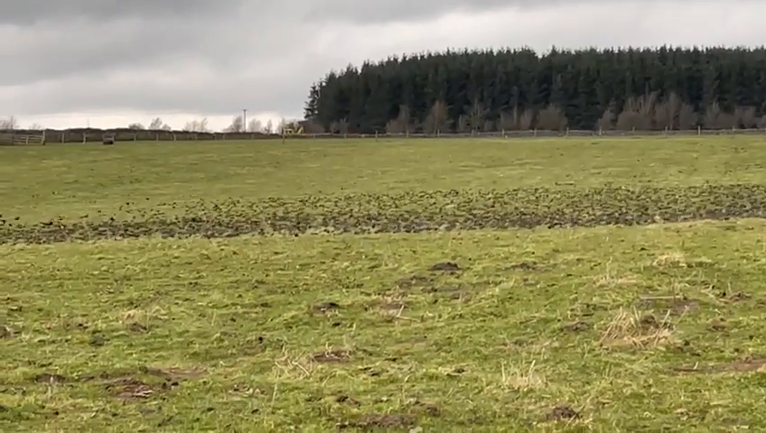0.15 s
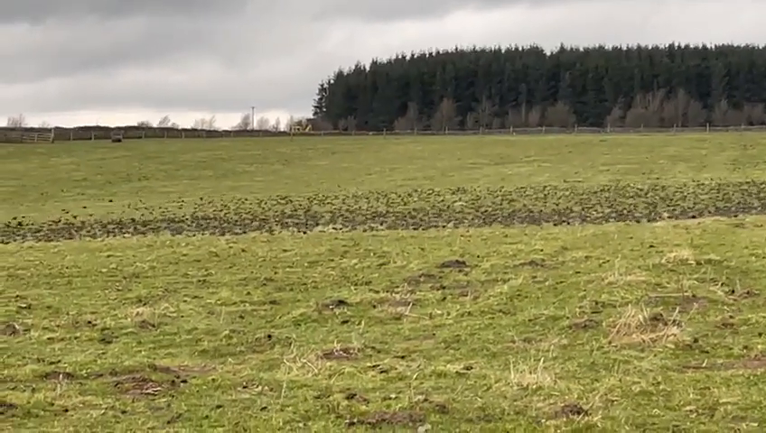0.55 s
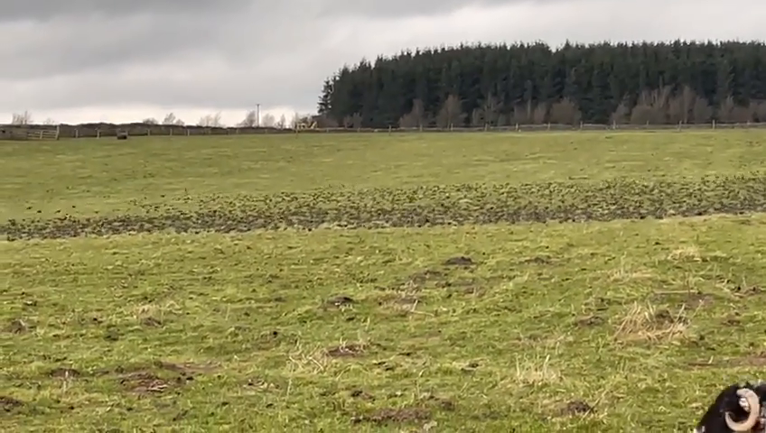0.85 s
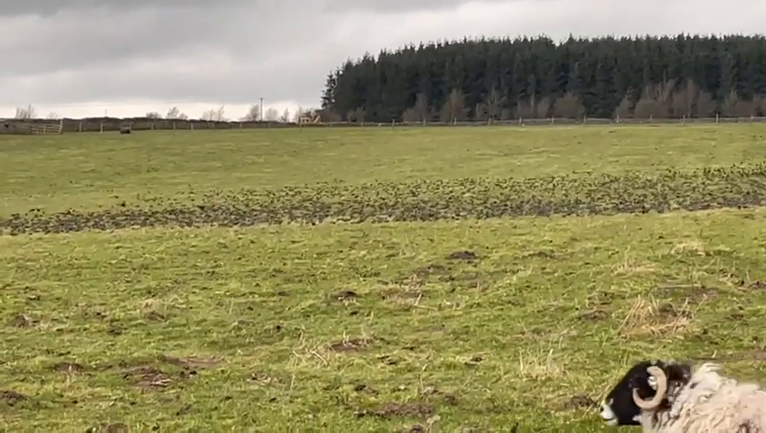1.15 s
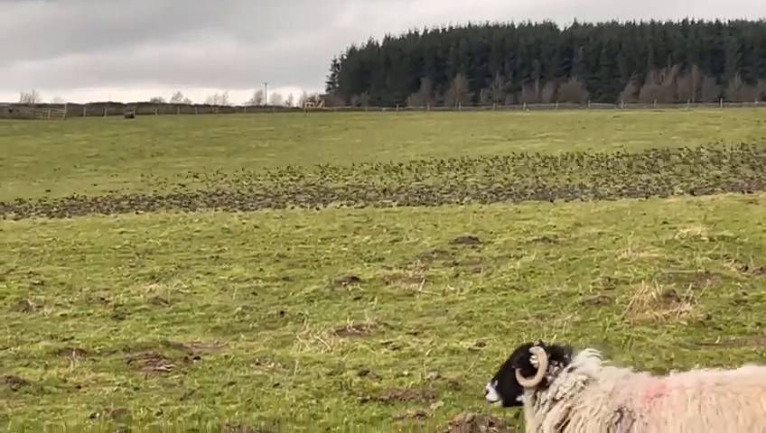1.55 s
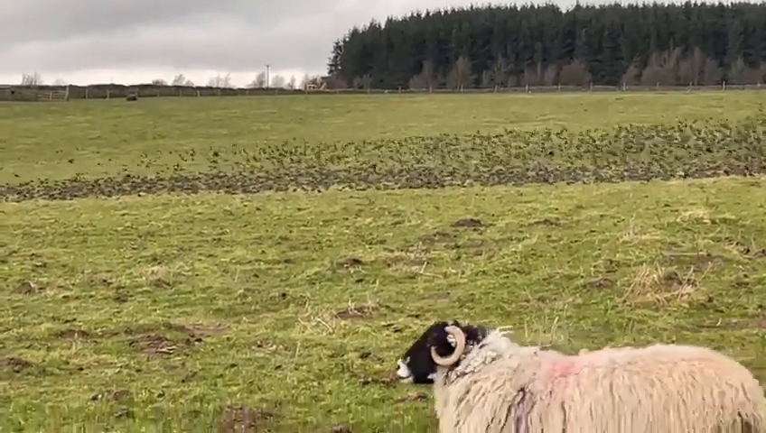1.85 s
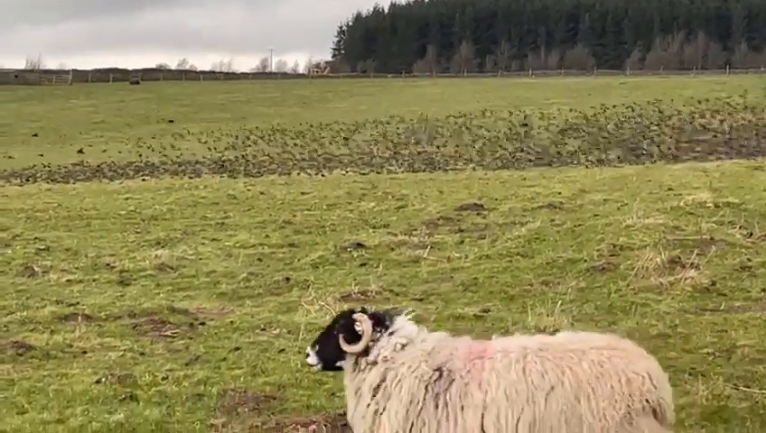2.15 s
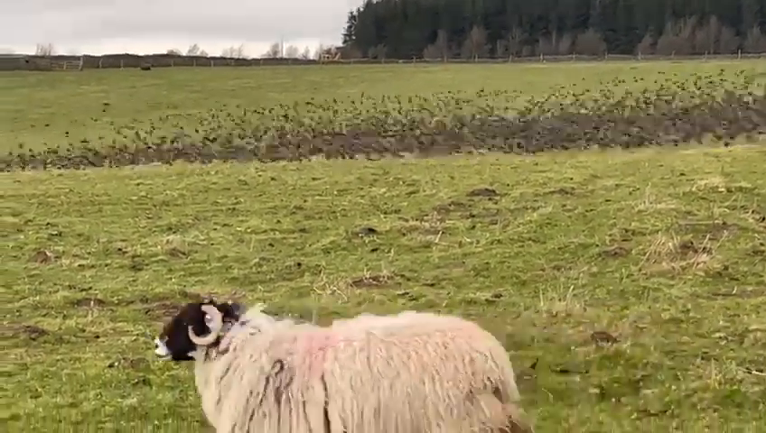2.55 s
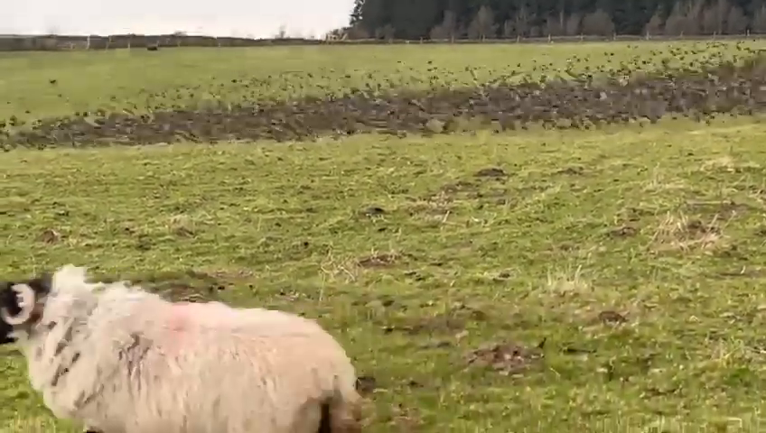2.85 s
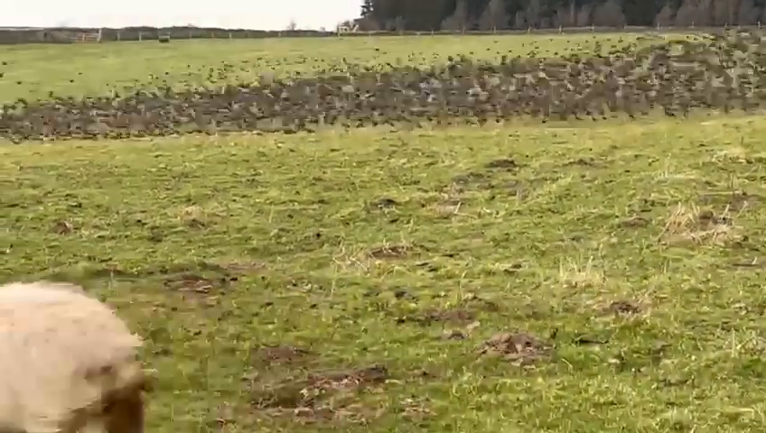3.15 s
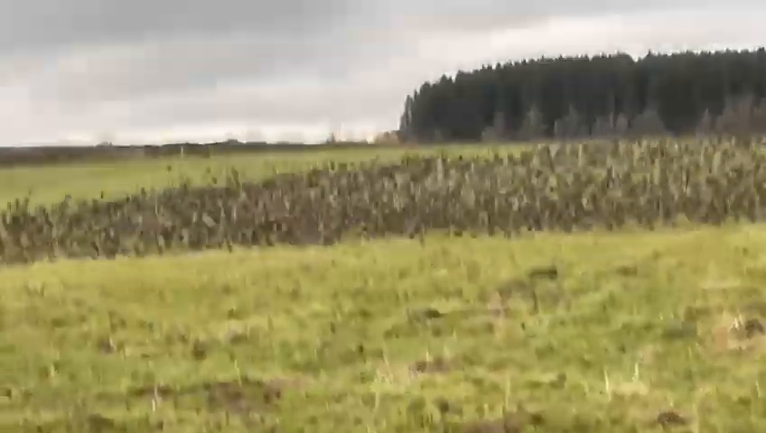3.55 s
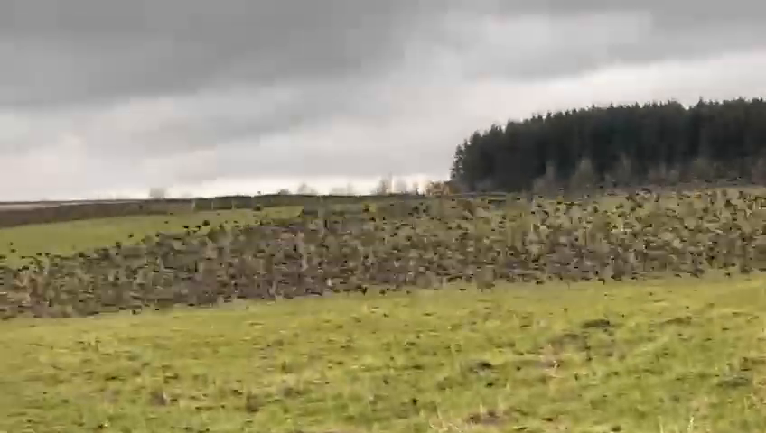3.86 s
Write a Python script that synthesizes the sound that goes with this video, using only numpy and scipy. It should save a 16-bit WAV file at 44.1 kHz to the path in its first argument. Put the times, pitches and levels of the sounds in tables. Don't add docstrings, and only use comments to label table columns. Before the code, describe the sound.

A large starling flock on an open field twitters in a thin, flickering hiss, then takes off with a deep, soft wing roar from about 1.7 seconds. Small handling ticks sit close to the stereo microphone.

```python
import sys
import numpy as np
from scipy import signal
from scipy.fft import rfft, irfft
from scipy.io import wavfile
from scipy.ndimage import uniform_filter1d

SR = 44100
rng = np.random.default_rng(int(sys.argv[2]) if len(sys.argv) > 2 else 0)


def wav_out(sig):
    wavfile.write(sys.argv[1], SR, np.round(np.clip(np.atleast_2d(sig).T, -1, 1) * 32767).astype(np.int16))


def voltage_ratio(decibels):
    exponent = np.asarray(decibels, float) / 20
    return 10 ** exponent


N = 176400
T = np.arange(N) / SR
HZ = np.fft.rfftfreq(N, 1 / SR)


def on_hz(table):
    f, v = np.array(table, float).T
    return np.interp(np.log(HZ + 1), np.log(f), v)


def curve(table, column):
    a = np.array(table, float)
    return np.interp(T, a[:, 0], a[:, column])


def colour(x, table):
    lo, hi = table[0][0], table[-1][0]
    ends = np.sqrt(1 + (lo / (HZ + 1)) ** 8 + (HZ / hi) ** 8)
    y = irfft(rfft(x) * voltage_ratio(on_hz(table)) / ends, N)
    return y / np.std(y)


def walk(rate_hz):
    k = int(SR / rate_hz)
    steps = np.repeat(rng.standard_normal(N // k + 3), k)
    return 1.529 * uniform_filter1d(uniform_filter1d(steps, k), k)[k:k + N]


def patchy(table, flicker_db, rate_hz):
    spectrum = rfft(colour(rng.standard_normal(N), table))
    half_octave = 2 * np.log2(HZ + 1)
    out = np.zeros(N)
    for k in range(15, 29):
        is_top = k > 25
        depth_db = flicker_db - 0.2 * is_top
        band = irfft(spectrum * np.clip(1 - abs(half_octave - k), 0, 1), N)
        out += band * voltage_ratio(depth_db * walk(rate_hz * (1 + is_top)))
    return out / np.std(out)


def add(out, start_s, x):
    i = int(max(start_s, 0) * SR)
    out[i:i + len(x)] += x[:N - i]


def note(length_s, hz0, hz1, rough, blur_hz):
    n = int(length_s * SR)
    wobble = uniform_filter1d(rng.standard_normal((2, 8192)), max(int(SR / blur_hz), 1))[:, :n]
    wobble = wobble / np.std(wobble)
    tone = np.exp(2j * np.pi * np.cumsum(np.linspace(hz0, hz1, n)) / SR)
    voice = np.real(tone * (1 - rough + rough * (wobble[0] + 1j * wobble[1])))
    return voice * np.sin(np.pi * np.arange(n) / n) ** .5


def crowd(count, centre_hz, octaves, longest_s, rough, blur_hz):
    out = np.zeros(N)
    for when, pitch, glide, length, loud in rng.random((count, 5)):
        hz = centre_hz * 2 ** (octaves * (pitch - .55))
        end_hz = hz * (1 + octaves * 0.316 * (glide - .55))
        add(out, 4 * when, note(.008 + longest_s * length, hz, end_hz, rough, blur_hz) * voltage_ratio(3.3 * loud))
    return out / np.std(out)


def tick(hz, cycles):
    t = np.arange(400) / SR
    grit = uniform_filter1d(rng.standard_normal((2, 400)), max(int(SR / hz), 1)) * np.sqrt(SR / hz)
    ring = np.imag(np.exp(2j * np.pi * hz * t) * (1 + 0.4 * (grit[0] + 1j * grit[1])))
    rise = np.minimum(t * hz / 1.8, 1) ** 2
    return np.exp(-t * hz / cycles) * rise * ring * 1.74


# t/s, wing stroke level/dB, feather rush level/dB, chatter level/dB
FLOCK_LEVELS = [(0, -69, -77.5, -65.5), (.14, -65, -78.5, -64), (.2, -64.5, -76.5, -71),
                (.5, -63, -75.5, -68.5), (.62, -62.5, -75, -66), (.8, -57.5, -75, -68),
                (1.35, -56, -77, -68), (1.5, -54, -76, -67), (1.7, -46.5, -77.5, -66.5),
                (1.9, -44, -74, -69.5), (2.1, -44, -71, -69.5), (2.45, -44, -66.5, -64.5),
                (2.8, -46, -68.5, -66), (3.1, -46, -69, -64.5), (3.3, -43, -68.5, -64),
                (3.55, -46.5, -67.5, -64), (3.7, -44.5, -66, -62.5), (4, -44, -65.5, -62)]
# f/Hz, level/dB (per Hz)
STROKE_SPECTRUM = [(32, -13), (48, -2), (80, 2.5), (130, -4), (250, -12.5), (400, -20.5), (560, -30),
                   (900, -74.5)]
# f/Hz, level/dB (per Hz)
RUSH_SPECTRUM = [(400, 10), (800, 1), (1300, -1), (1650, 1.5), (1900, -1), (2250, 2), (3000, 0),
                 (12500, -19)]


def wings():
    beats_per_s, groups, stroke_s = 14, 60, 0.011
    beat = np.zeros(N)
    for rate, phase, size in rng.random((groups, 3)):
        at_s = (np.arange(100) + phase) / (beats_per_s * (0.95 + .5 * rate))
        at = (at_s * SR).astype(int)
        beat[at[at < N]] += voltage_ratio(5.5 * size) ** 2
    k = int(stroke_s * SR)
    puffs = np.sqrt(uniform_filter1d(uniform_filter1d(beat, k), k) / np.mean(beat))
    gusts = voltage_ratio(0.6 * walk(7.06))
    roar = colour(puffs * rng.standard_normal(N), STROKE_SPECTRUM) * gusts
    rush = patchy(RUSH_SPECTRUM, 1.0, 9) * puffs ** 0.29
    return roar * voltage_ratio(curve(FLOCK_LEVELS, 1) - 1.5) + rush * voltage_ratio(curve(FLOCK_LEVELS, 2) + 6.5)


def chatter():
    thinning = voltage_ratio(-4 - 5.7 * np.clip(T - 2.1, 0, 1))
    high = thinning * crowd(360, 5000, .9, 0.027, 0.6, 700)
    alarm = 0.25 + 2 * np.exp(-((T - 2.42) / .33) ** 2)
    calm_whistles = crowd(180, 1730, 0.209, 0.031, 0.19, 110)
    alarm_whistles = alarm * crowd(360, 2270, 0.197, 0.04, 0.44, 150)
    low = voltage_ratio(-12.5) * (calm_whistles + alarm_whistles)
    return (high + low) * voltage_ratio(curve(FLOCK_LEVELS, 3))


# f/Hz, level/dB (per Hz)
FAR_VOICE_SPECTRUM = [(1200, -26.5), (1700, -7.5), (2000, -9.5), (3200, -5.5), (5000, -0.5), (6500, -4),
                      (9000, -6), (12500, -15)]


def far_voices():
    flicker = voltage_ratio(1.1 * walk(11))
    return patchy(FAR_VOICE_SPECTRUM, 3.17, 10) * flicker * voltage_ratio(curve(FLOCK_LEVELS, 3) + 0.1)


# start t/s, length t/s, start f/Hz, end f/Hz, level/dB
NEAR_CALLS = [(0.063, 0.11, 4900, 4470, -64), (0.088, 0.075, 6000, 6280, -64),
              (0.28, 0.062, 4220, 4690, -63.5), (0.317, 0.066, 7000, 6460, -67),
              (0.54, 0.041, 4200, 4050, -64), (0.576, 0.14, 5500, 4740, -60),
              (0.753, .08, 5000, 5060, -65.5), (0.895, 0.0058, 7000, 5740, -61),
              (0.9, 0.036, 6800, 6860, -62.5), (0.944, 0.066, 5800, 5600, -63),
              (1.017, 0.048, 5100, 4680, -58), (1.075, 0.049, 5300, 5270, -62),
              (1.306, 0.082, 5100, 4840, -61), (1.447, 0.04, 5000, 4550, -64),
              (1.47, 0.04, 4400, 4490, -58), (1.526, 0.033, 5400, 4810, -57),
              (1.562, .14, 4200, 5560, -62.5), (1.797, 0.085, 4800, 5420, -63.5),
              (2.051, .035, 5900, 5250, -63.5), (2.075, 0.085, 5350, 4570, -58),
              (3.12, .03, 5170, 4250, -58), (3.155, 0.037, 4600, 3950, -56.5)]


def near_calls():
    out = np.zeros(N)
    for start, length, hz0, hz1, db in NEAR_CALLS:
        add(out, start, note(length, hz0, hz1, 1.0, 700) * voltage_ratio(db - 5.5))
        for at, off, slope in rng.random((12, 3)):
            hz = (hz0 + (hz1 - hz0) * at) * (1 + 0.25 * (off - .5))
            syllable = note(0.011, hz * (1 + 0.11 * slope), hz * (1 - 0.12 * slope), 0.33, 400)
            gain = voltage_ratio(db - 5.0 + 2.5 * slope) * np.sqrt(length / 0.063)
            add(out, start + at * length, syllable * gain)
    return out


# start t/s, length t/s, start f/Hz, end f/Hz, level/dB
CLEAR_WHISTLES = [(0, 0.049, 1770, 1844, -70), (.09, 0.036, 1850, 2000, -74),
                  (0.155, 0.04, 1960, 1800, -79), (.205, 0.039, 1970, 1950, -76),
                  (.25, 0.037, 1650, 1720, -79), (.55, 0.044, 2030, 1950, -77), (.8, .04, 1720, 1740, -83),
                  (.86, 0.062, 1740, 1800, -86), (1.09, 0.077, 1750, 1700, -83),
                  (1.39, .07, 1810, 1700, -88), (1.54, 0.045, 1650, 1750, -77),
                  (1.64, 0.12, 1660, 1716, -79), (2.09, .04, 2250, 2280, -75),
                  (2.24, 0.084, 2230, 2220, -73), (2.37, .07, 2200, 2150, -77),
                  (2.46, .03, 1560, 1600, -67), (2.48, .03, 2500, 2467, -69),
                  (2.49, 0.043, 2260, 2226, -69), (2.555, 0.041, 2170, 2110, -67.5),
                  (2.6, 0.053, 1600, 1705, -65), (2.64, .06, 2400, 2460, -68),
                  (2.735, 0.076, 2050, 2090, -68), (2.924, 0.057, 2015, 1990, -66),
                  (2.99, 0.035, 2000, 1925, -65.5), (3.0, 0.053, 1760, 1710, -69),
                  (3.16, 0.05, 823, 800, -68), (3.91, 0.026, 933, 830, -66.5)]


def whistles():
    out = np.zeros(N)
    for start, length, hz0, hz1, db in CLEAR_WHISTLES:
        add(out, start, note(length, hz0, hz1, 0.3, 150) * voltage_ratio(db + 5.5))
    return out


# t/s, peak level/dB, ring f/Hz, ring length [cycles]
HAND_TICKS = [(.563, -65, 10000, 9), (0.686, -66, 11500, 7.9), (0.704, -57, 11000, 14),
              (0.7046, -47, 4100, 2.3), (.71, -45, 413, 1.4), (0.731, -51, 2600, 3.2),
              (0.732, -54, 7200, 6.6), (.739, -47, 1780, 1.3), (.7392, -54.5, 10000, 9.2),
              (0.738, -49, 6700, 3.5), (0.823, -62, 11200, 15), (.828, -62.5, 10000, 18),
              (.9, -53, 5700, 6.1), (1.019, -46, 2460, 1.4), (2.471, -42, 1600, 1.4),
              (2.471, -45, 4480, 2.3), (2.6, -39.5, 4130, 1.7), (2.936, -49, 3470, 3.5),
              (2.9385, -54, 7100, 1.6), (2.9388, -68, 10600, 10), (2.9394, -38, 4200, 2.7),
              (3.166, -44.5, 3860, 3), (3.173, -57, 10200, 9.2), (3.176, -38, 4730, 2),
              (3.203, -57, 10700, 11), (3.299, -45.5, 3007, 2), (3.36, -52, 3700, 1.98),
              (3.366, -59, 10300, 17), (3.389, -47, 4204, 2), (3.4756, -54, 4300, 2.6),
              (3.5946, -51, 10200, 5), (3.5957, -33.5, 5300, 3.6), (3.5966, -44, 1194, 1.5),
              (3.5992, -33, 4550, 2.7), (3.6025, -53, 10800, 6.9), (3.6097, -40, 5170, 3.1),
              (3.615, -49, 3000, 2), (3.652, -61, 10450, 28), (3.656, -42, 4030, 2.4),
              (3.658, -50, 2480, 2.5), (3.779, -58, 10500, 15), (3.844, -51, 3500, 2),
              (3.851, -65, 10500, 15), (3.909, -51, 4304, 1.8), (3.931, -40, 5000, 1.6),
              (3.99, -44, 2500, 1.6)]


def hand_ticks():
    out = np.zeros(N)
    for start, db, hz, cycles in HAND_TICKS:
        add(out, start, tick(hz, cycles) * voltage_ratio(db))
    return out


def grass_crackle():
    out = np.zeros(N)
    for when, pitch, rarity in rng.random((200, 3)):
        level_db = -63.5 - 4.8 * np.log(rarity + 0.011)
        add(out, 4 * when, tick(3000 * 4 ** pitch, 1.9) * voltage_ratio(level_db))
    return out


# t/s, firing f/Hz, level/dB, extra load level/dB
ENGINE_RUN = [
    (0, 57.27, -63.5, -28),
    (.5, 57.41, -68.5, -5.5),
    (1, 57, -59, -14),
    (1.35, 57.12, -64, 0),
    (2, 56.38, -60, 2.5),
    (3, 56.59, -59.5, 1),
    (3.6, 56.07, -63, 8.5),
    (4, 56.6, -48, -13),
]
# multiple of firing f, level/dB, share of the load [0-1]
ENGINE_ORDERS = [(2, 2, 0.98), (3, 0.5, 0.042), (4, -7, 1), (5, -9.5, 0.65), (6, -15, 0.97)]


def engine():
    firing_hz = curve(ENGINE_RUN, 1) * (1 + 0.00888 * walk(9))
    phase = 2 * np.pi * np.cumsum(firing_hz) / SR
    level_db, load_db = curve(ENGINE_RUN, 2), curve(ENGINE_RUN, 3)
    out = np.zeros(N)
    for multiple, db, share in ENGINE_ORDERS:
        out += np.sin(multiple * phase) * voltage_ratio(2.5 + db + level_db + share * load_db + 1.85 * walk(9))
    return out


# f/Hz, right port's lead [turns]
PORT_LEAD = [(200, 0), (1500, .08), (2150, 0), (6750, 0), (7700, .5), (9000, .5), (10400, 1), (12000, 1)]
# f/Hz, level/dB
PORT_DIFFUSE = [(50, -30), (170, -12.5), (350, -11.5), (700, -3), (1700, -2.5), (2000, -5.5)]
# f/Hz, left minus right level/dB
PORT_TILT = [(700, 0), (1500, 5), (2150, 0), (12000, 0)]


def scene():
    turn = voltage_ratio(on_hz(PORT_TILT) / 2) * np.exp(-1j * np.pi * on_hz(PORT_LEAD))
    top = 1 / (1 + (HZ / 12050) ** 60)
    near = rfft(near_calls() + whistles() + hand_ticks() + grass_crackle())
    shared = (rfft(wings() + far_voices() + chatter() + engine()) + near) * top
    low = 1 / (1 + (HZ / 2150) ** 30)
    diffuse = voltage_ratio(on_hz(PORT_DIFFUSE)) * low + voltage_ratio(-26) * (1 - low)
    apart = (rfft(wings() + far_voices()) * diffuse + near * voltage_ratio(-26.5)) * top
    left, right = (shared + apart) * turn, (shared - apart) / turn
    return np.array([irfft(left, N), irfft(right, N)])


def low_pass(x):
    return signal.sosfilt(signal.butter(12, 12510, fs=SR, output="sos"), x)


def record(dry):
    lead_in = 648
    pair = np.array([[.5, .5], [.5, -.5]])
    mid_side = pair @ np.pad(dry, ((0, 0), (lead_in, 0)))
    hz, _, z = signal.stft(mid_side, SR, "cosine", 2048, 1024)
    power = uniform_filter1d(abs(z) ** 2, 4, axis=1)
    floor = np.median(power[0][(hz > 10000) & (hz < 11000)], axis=0) * voltage_ratio(-4)
    scatter = np.repeat(rng.standard_normal((65, len(floor))), 16, axis=0)[:len(hz)]
    floor = signal.medfilt(np.pad(floor, 4, "edge"), 9)[4:-4] * voltage_ratio(5 * scatter)
    keep = (power > floor) | (hz[:, None] < 2200)
    kept = signal.istft(z * keep, SR, "cosine", 2048, 1024)[1]
    return low_pass(2 * pair @ kept[:, lead_in:lead_in + N])


dry = scene()
out = record(dry)
wav_out(out)
```